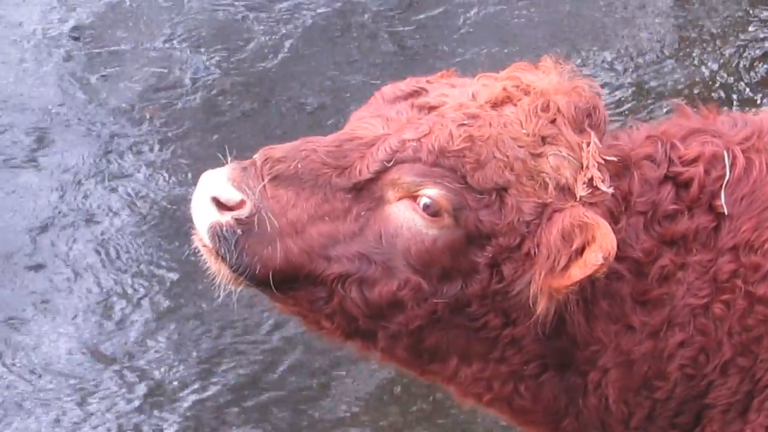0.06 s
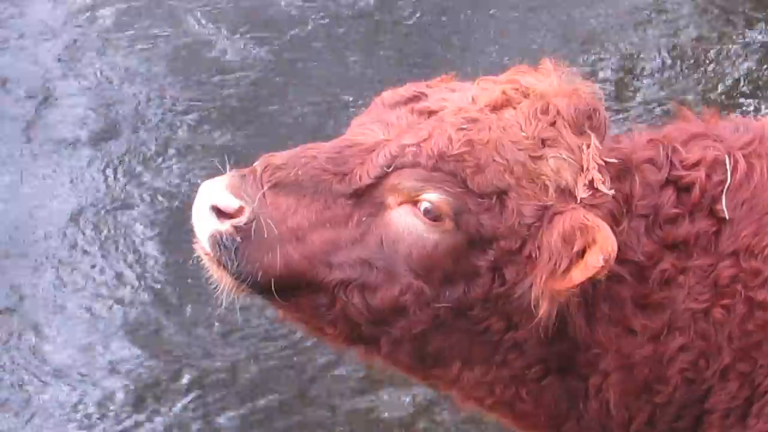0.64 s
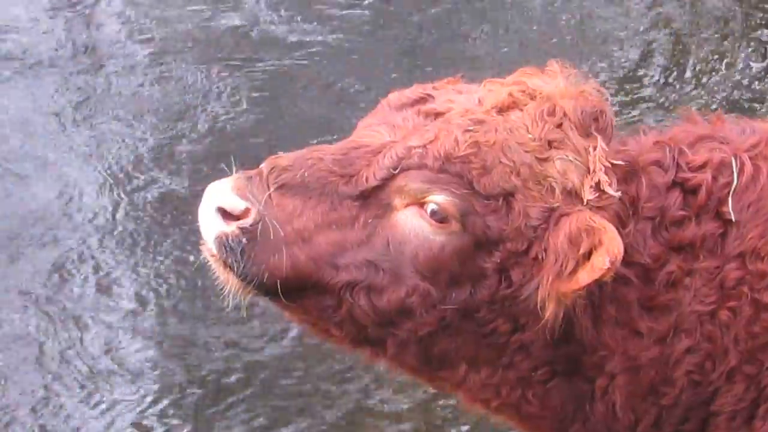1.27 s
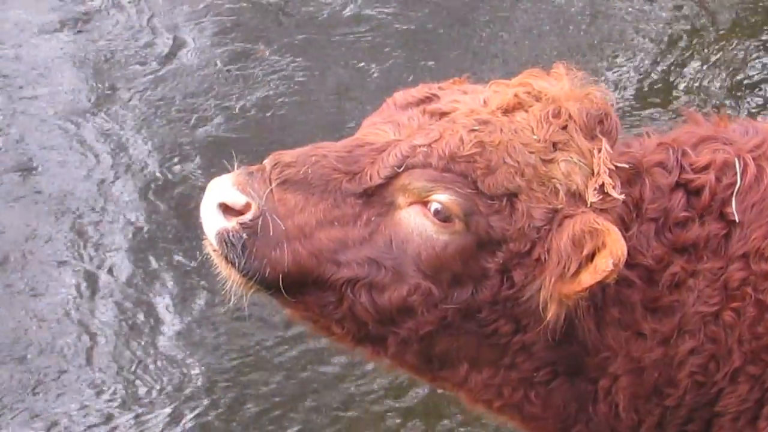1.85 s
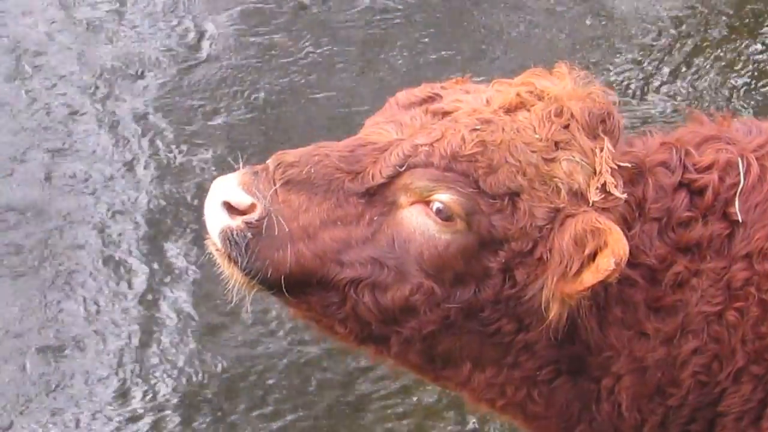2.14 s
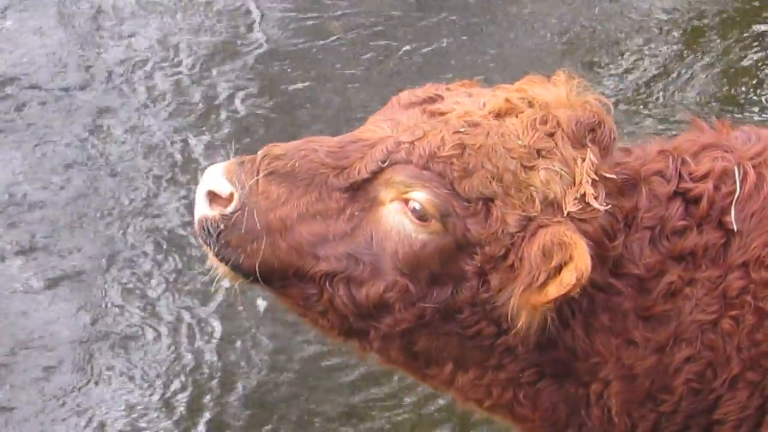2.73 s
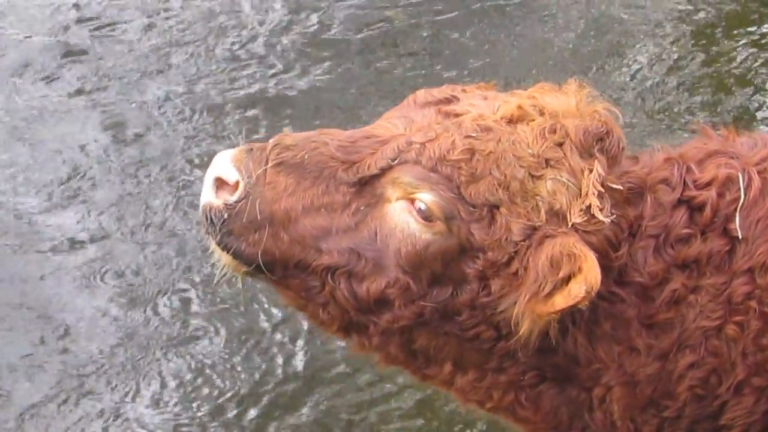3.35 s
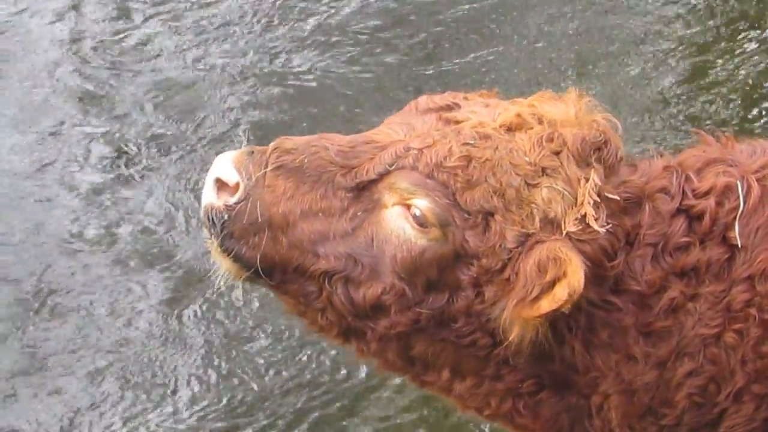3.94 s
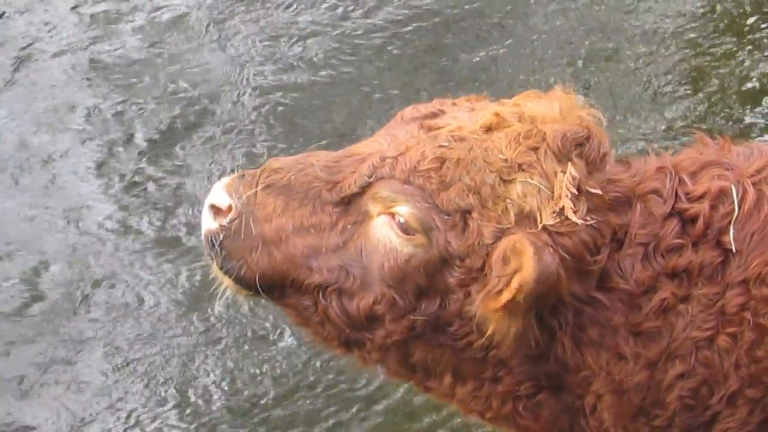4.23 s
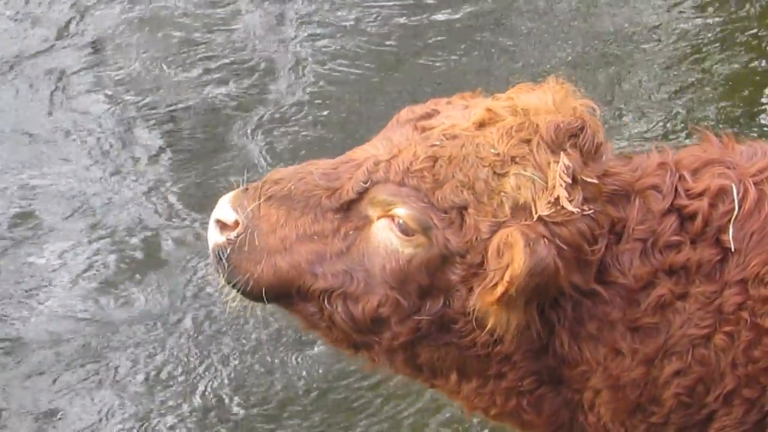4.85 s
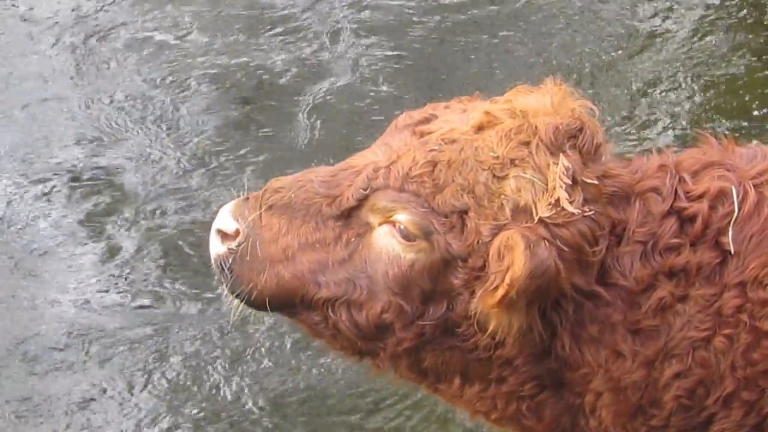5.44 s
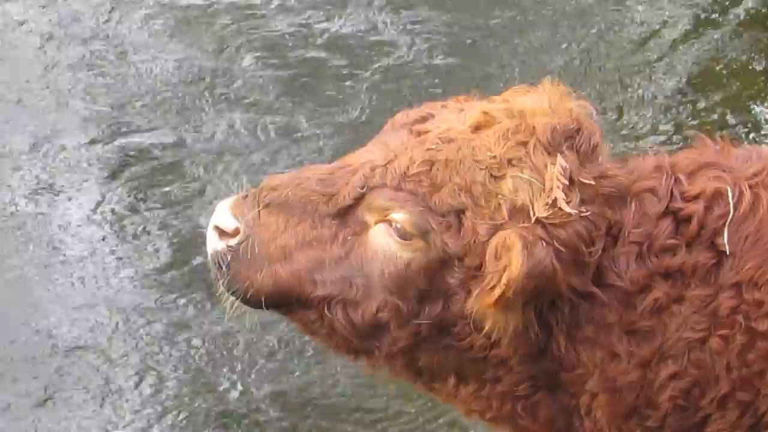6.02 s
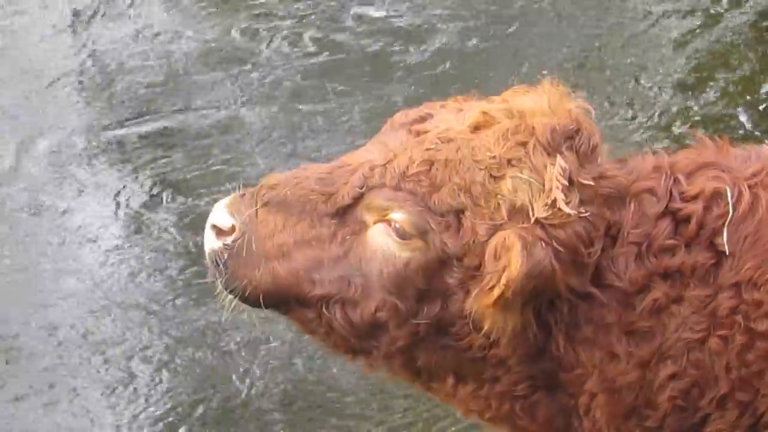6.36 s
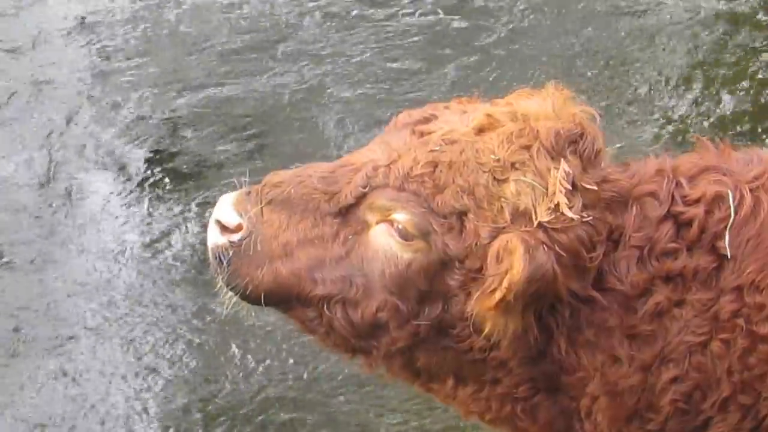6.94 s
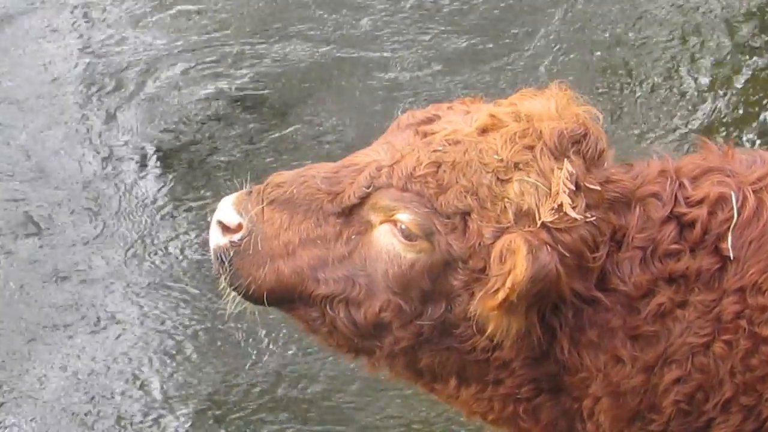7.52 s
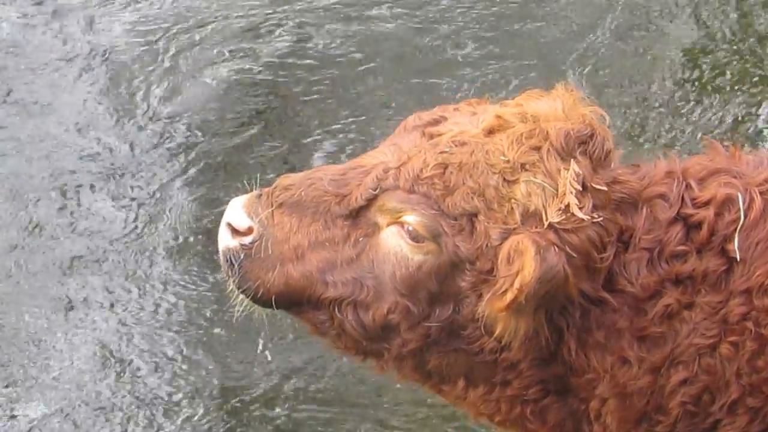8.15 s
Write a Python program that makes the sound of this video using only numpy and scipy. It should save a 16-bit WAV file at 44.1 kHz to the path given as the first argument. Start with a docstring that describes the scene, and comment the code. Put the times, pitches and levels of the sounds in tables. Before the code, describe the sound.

A creek rushes steadily with faint bubbling. About two seconds in, a bull starts a low closed-mouth hum with breath hissing through its nose. The pitch climbs and opens into a loud blare, cracks into a thin whistle, turns to a hoarse roar and drops away in a grunt. The water runs on alone, heard outdoors in stereo with the animal close by.

```python
"""A creek rushes steadily, heard in stereo. After two seconds a bull bellows once beside it.
Pulses of the vocal folds hum in the shut mouth and hiss through the nose, climbing two octaves.
The mouth opens on a clear harmonic blare; the voice cracks into a thin whistle, a second oscillation
of the larynx; the strained folds flap irregularly and ring the throat in a hoarse roar.
At last they slacken and the pitch drops away in a grunt. The water and its bubbles run on."""
import sys
import numpy as np
from scipy import signal
from scipy.fft import rfft, irfft
from scipy.io import wavfile
from scipy.ndimage import uniform_filter1d

SR = 44100
rng = np.random.default_rng(int(sys.argv[2]) if len(sys.argv) > 2 else 0)


def pcm_store(signal):
    """Save signal as 16-bit PCM."""
    levels = np.round(np.clip(np.atleast_2d(signal), -1, 1) * 32767)
    wavfile.write(sys.argv[1], SR, levels.astype(np.int16).T)


N = 361179
T = np.arange(2 * SR, int(4.5 * SR)) / SR  # time axis of the call, t/s
GRUNT_START_S, GRUNT_ATTACK_S = 3.892, 0.053


def bellow(whistle_cycles, slack_roughness=0.88, slack_db=-3):
    """Periodic and chaotic vibration of the vocal folds: roughness shifts power from blare to roar."""
    gain, upper_db, roughness = pushes()
    slack = np.clip((T - GRUNT_START_S) / GRUNT_ATTACK_S, 0, 1)  # the folds lose tone and force
    roughness = np.clip(roughness + slack * (slack_roughness - roughness), 0, 1)
    periodic = np.sqrt(1 - roughness ** 2) * blare(whistle_cycles, upper_db, roughness)
    chaotic = roughness * roar(upper_db)
    return gain * amp(slack_db * slack) * (periodic + chaotic)


# Pushes of breath through the open mouth:
# start t/s, length t/s, release t/s, level/dB, relative upper-throat level/dB, roughness (0-1)
BREATH_PUSHES = [(2.868, 0.041, 0.024, -12, -16, 0.08), (2.913, 0.12, 0.027, -13, -12, 0.1),
                 (3.036, 0.051, 0.021, -12.5, -11, 0.13), (3.099, 0.056, .01, -14.5, -10.5, 0.43),
                 (3.162, 0.039, 0.043, -12, -13, 0.23), (3.305, 0.023, 0.013, -22.5, -9, .5),
                 (3.359, 0.025, 0.048, -27.5, -1.5, 0.53), (3.455, 0.078, 0.0061, -16, -9, 0.67),
                 (3.529, .075, 0.027, -13.5, -7.5, 0.53), (3.614, 0.17, 0.016, -15.5, -9.5, 0.76),
                 (3.784, 0.16, 0.035, -15, -10, 0.57)]


def pushes(attack_s=0.016, rough_attack_s=0.0074, sag_db_per_s=4):
    """Overlapping pushes add in power; upper-throat level and roughness are power-weighted means."""
    gains = np.array([envelope(start, attack_s + rough_attack_s * roughness, length, release)
                      * amp(db - sag_db_per_s * (T - start))
                      for start, length, release, db, _, roughness in BREATH_PUSHES])
    power = (gains ** 2).sum(0)
    upper_db, roughness = np.transpose(BREATH_PUSHES)[-2:] @ gains ** 2 / (power + 1e-20)
    return np.sqrt(power), upper_db, np.clip(roughness, 0, 1)


# Upper partials of the blare: harmonic number, relative level/dB
BLARE_HARMONICS = [(3, -27), (4, -22), (5, -10.5), (6, -31), (7, -39.5), (8, -41), (9, -43)]


def blare(whistle_cycles, upper_db, roughness, half_clear_roughness=0.19):
    """A harmonic series led by its second partial, which lies on the throat's resonance."""
    clarity = 1 / (1 + (roughness / half_clear_roughness) ** 2)
    richness_db = upper_db + 14
    fundamental_db = clarity * (richness_db - 13) - (1 - clarity) * 30.5
    cycles, _, _ = vocal_folds(voice_pitch(), jitter=0.002 + 0.05 * roughness, jitter_hz=110)
    phase, whistle_phase = 2 * np.pi * cycles, 2 * np.pi * whistle_cycles
    core = np.cos(2 * phase) + amp(fundamental_db) * np.cos(phase)
    harmonics = sum(amp(db + 2.2 * drift(30)) * np.cos(k * phase) for k, db in BLARE_HARMONICS)
    # folds and whistle modulate each other, giving sum and difference tones
    sidebands = np.cos(whistle_phase + 2 * phase) + amp(-10) * np.cos(2 * whistle_phase - 2 * phase)
    tone = core + clarity * amp(richness_db) * harmonics + (1 - clarity) * amp(upper_db - 2) * sidebands
    shimmer = amp(2.5 * roughness * drift(81))
    return np.sqrt(2) * tone * shimmer


# Lower and upper resonances of the throat: f/Hz, bandwidth/Hz, relative level/dB
THROAT_FORMANTS = [(345, 26, -11.5), (472, 30, 2.5), (561, 52, -2.5), (652, 45, 0), (747, 48, -7),
                   (1147, 22, -9)]
UPPER_FORMANTS = [(1457, 46, -3), (1517, 48, -6), (1693, 33, -10), (1952, 34, -12.5), (2273, 18, -21.5),
                  (2650, 50, -30)]
# Spectrum of the rasping breath: f/Hz, relative level/dB
RASP_SPECTRUM = [(200, -29), (350, -18.5), (560, -3), (750, -17), (950, -9), (1350, -23), (1550, -11),
                 (1980, -17), (2300, -36), (3000, -29), (5000, -43.5), (7000, -56), (10000, -63.5),
                 (15000, -81)]


def roar(upper_db, rasp_db=-10):
    """Aperiodic excitation: closures of uneven size and spacing ring the formants of the throat."""
    _, pulses, puffs = vocal_folds(voice_pitch(), jitter=0.3, jitter_hz=178.46)
    flaps = pulses * amp(2.9 * drift(120)) + 0.61 * puffs
    lower = steady_rms(bandpass(resonate(flaps, THROAT_FORMANTS), 377, 1350), size=700)
    upper = steady_rms(bandpass(resonate(flaps, UPPER_FORMANTS), 1290, 2700), size=700)
    rasp = unit_rms(shape_spectrum(puffs, RASP_SPECTRUM))
    return lower + amp(upper_db + 1.5) * upper + amp(rasp_db) * rasp


# Fundamental of the folds as it climbs, then as it wavers under strain: t/s, f/Hz
RISING_PITCH = [(2.1, 71.84), (2.308, 94.7), (2.464, 119.3), (2.578, 151.1), (2.614, 174.5), (2.662, 228.5),
                (2.754, 274.6), (2.8, 289.6), (2.87, 305.3), (2.966, 305.7), (3.1, 346.3)]
STRAINED_PITCH = [(3.107, 320.4), (3.154, 300.8), (3.18, 315.8), (3.24, 332.5), (3.33, 335), (3.385, 262.9),
                  (3.48, 288.3), (3.87, 283)]


def voice_pitch():
    """The rate at which the folds close is the fundamental frequency of hum, blare and roar."""
    return contour(RISING_PITCH + STRAINED_PITCH)


def vocal_folds(hz, jitter, jitter_hz):
    """The glottal source: its cycle count, a pulse at each closure and the puff of air after it."""
    cycles = np.cumsum(hz * (1 + jitter * drift(jitter_hz))) / SR
    offset = (cycles - np.round(cycles)) * SR / hz  # samples from the nearest closure
    pulses = np.sinc(offset * 3 / 4) * np.exp(-(offset / 8) ** 2)
    pulse_mean = 4 / 3 * hz / SR
    puffs = (0.12 + np.exp(-(cycles % 1) / 0.28)) * rng.standard_normal(len(T))
    return cycles, steady_rms(pulses - pulse_mean, size=2000), unit_rms(puffs)


# Response of the vocal tract in the grunt: f/Hz, relative level/dB
GRUNT_SPECTRUM = [(70, -13), (140, -5), (230, 11), (330, -3.5), (480, -1.5), (600, -27), (760, 5.5),
                  (950, -28), (1500, -11), (3000, -57.5)]


def grunt(from_hz=345, to_hz=69.6, middle_s=3.954, fall_s=0.025, level_db=-15.5):
    """Pitch falls with tension: the folds slacken along an S-curve into a few uneven flaps."""
    hz = to_hz + (from_hz - to_hz) / (1 + np.exp((T - middle_s) / fall_s))
    _, pulses, puffs = vocal_folds(hz, jitter=0.046, jitter_hz=90.3)
    voice = steady_rms(shape_spectrum(pulses + 0.078 * puffs, GRUNT_SPECTRUM), size=600)
    return envelope(GRUNT_START_S, GRUNT_ATTACK_S, length=0.065, release=0.05) * amp(level_db) * voice


# Response of the vocal tract with the mouth shut: f/Hz, relative level/dB
HUM_SPECTRUM = [(50, -2.5), (75, 13), (100, 11), (135, 4.5), (200, 7.5), (280, 5), (400, 2.5), (580, -4),
                (680, -4), (760, 1.5), (860, -8.5), (1000, -14.5), (1200, -23), (1500, -17), (2200, -55),
                (4000, -62)]


def hum(pulses, puffs, level_db=-23, slack_hz=77.3, register_hz=164):
    """Source and filter: the shut mouth passes mainly the low partials of the glottal pulses."""
    hz = voice_pitch()
    slack_loss_db = 16.5 * (slack_hz / hz) ** 2  # slack folds sound weakly
    register_dip_db = 8.5 * np.exp(-(np.log2(hz / register_hz) / 0.085) ** 2)  # the register changes
    source = slow_opening(pulses) + 0.5 * bandpass(puffs, 400, 5000)
    boom = steady_rms(shape_spectrum(source, HUM_SPECTRUM), size=1500)
    gain = envelope(start=2.085, attack=0.05, length=0.783, release=0.014)
    return gain * amp(level_db - slack_loss_db - register_dip_db) * boom


def slow_opening(pulses, corner_hz=55):
    """All-pass dispersion: the folds open slowly and snap shut, so low tones lead each pulse."""
    pole = np.exp(-2 * np.pi * corner_hz / SR)
    return signal.lfilter([pole, -1], [1, -pole], pulses[::-1])[::-1]


# Partials of the whistle: harmonic number, relative level/dB
WHISTLE_HARMONICS = [(1, -2.5), (2, -13), (3, -23.5), (4, -54), (5, -37.5), (6, -39), (8, -46)]


def whistle(top_s=3.265, top_hz=1044, floor_hz=968, bend_hz_per_s2=970, level_db=-28.5):
    """Biphonation: a second, higher oscillation of the larynx, richer the louder it is."""
    hz = np.maximum(top_hz - bend_hz_per_s2 * (T - top_s) ** 2, floor_hz)
    force = envelope(start=3.02, attack=0.33, length=0.44, release=0.061)
    cycles = np.cumsum(hz * (1 + 0.004 * drift(90))) / SR
    tone = 0
    for k, db in WHISTLE_HARMONICS:
        waver_db = 2.5 * np.log(k) * drift(22)
        tone += amp(db + waver_db) * force ** (0.36 * np.log(k)) * np.cos(2 * np.pi * k * cycles)
    return force * amp(level_db) * unit_rms(tone), cycles


# Airflow through the nose, greatest just before the mouth opens: t/s, relative level/dB
NASAL_FLOW = [(2.1, -25), (2.17, -9.5), (2.32, -6), (2.38, -12), (2.44, -5.5), (2.6, -1), (2.79, -0.5),
              (2.93, -2.5), (3.06, -6.5), (3.28, -12.5), (3.96, -12), (4.06, -18)]
# Resonances of nasal cavity, nostrils, narrowed nostrils and jet: f/Hz, bandwidth/Hz, relative level/dB
CAVITY_MODES = [(1685, 93, 3), (2280, 140, -3.5), (2580, 117, 4), (2500, 84, -12), (3200, 140, -12.5)]
NOSTRIL_MODES = [(3710, 110, -9.5), (4280, 350, -18.5), (5100, 130, -6)]
NARROWED_MODES = [(1760, 32, -5), (3630, 63, -17), (4420, 80, -1)]
JET_MODES = [(3200, 500, -5), (6440, 660, -2), (7600, 270, -0.5), (8160, 200, -5.5), (9350, 110, 6.5),
             (10060, 490, 3), (10700, 420, 7), (12000, 900, -10), (13650, 300, -10)]
# Broadband hiss of the jet: f/Hz, relative level/dB
JET_SPECTRUM = [(1000, -27.5), (3000, -4.5), (4500, 0), (6500, -5.5), (8500, 4.5), (11000, -10),
                (13000, -1.5), (14000, -16), (15000, -25.5)]


def nose(pulses, puffs):
    """Forced resonance: air chopped by the folds buzzes, wheezes and hisses, louder with more flow."""
    flow_db = contour(NASAL_FLOW)
    flowing = (T > NASAL_FLOW[0][0]) & (T < NASAL_FLOW[-1][0])
    buzz = steady_rms(bandpass(resonate(pulses + 0.7 * puffs, CAVITY_MODES), 1400, 4700))
    wheeze = steady_rms(bandpass(resonate(pulses + 0.99 * puffs, NOSTRIL_MODES), 2400, 5400))
    # the jet wanders, so its high resonances come and go
    jet = puffs + 0.22 * pulses
    sibilance = sum(amp(2.5 * drift(7)) * resonate(jet, [mode]) for mode in JET_MODES)
    hiss = steady_rms(unit_rms(sibilance) + amp(-4) * unit_rms(shape_spectrum(jet, JET_SPECTRUM)))
    breath = (amp(-38 + 1.2 * flow_db) * buzz
              + amp(-49 + 0.84 * flow_db) * wheeze
              + amp(-51 + 1.16 * flow_db) * hiss)
    # the nostrils sing while they are still narrow
    narrow = envelope(start=2.15, attack=0.13, length=0.19, release=0.036)
    singing = steady_rms(bandpass(resonate(pulses + puffs, NARROWED_MODES), 1400, 3800))
    return flowing * breath + narrow * amp(-45.5) * singing


def bank_echoes(x, t60_s=0.35, level_db=-22, echoes_per_s=2000, first_s=0.006):
    """Scattering from the water and the banks sends different faint echoes to each microphone."""
    t = np.arange(SR // 2) / SR
    taps = rng.standard_normal((2, len(t))) * (rng.random((2, len(t))) < echoes_per_s / SR)
    taps *= amp(-60 * t / t60_s) * (t > first_s)
    taps /= np.linalg.norm(taps[0])
    return amp(level_db) * signal.fftconvolve(x[None], taps, axes=1)[:, :len(x)]


# Spectral density of the rushing water: f/Hz, relative level/dB
RUSH_SPECTRUM = [(20, -13), (27, -15), (35, -4.5), (47, -19.5), (62, -2.5), (80, -8), (120, 2.5),
                 (190, -8.5), (300, -5.5), (480, -13), (800, -12.5), (1700, -18.5), (4500, -29),
                 (7000, -31), (11000, -39), (13500, -42.5), (15000, -69.5)]
# Resonant peaks of its gurgle: f/Hz, bandwidth/Hz, added level/dB
GURGLE_PEAKS = [(295, 45, 4.5), (548, 45, 7), (730, 60, 3.5), (10150, 600, 5)]
# Likeness of left and right: f/Hz, coherence (0-1)
RUSH_COHERENCE = [(30, .5), (60, .9), (130, 0.64), (290, 0.51), (630, 0.41), (1400, 0.47), (3000, 0.62),
                  (6600, 0.16), (14000, 0.067)]
# Excess of left over right: f/Hz, level/dB
RUSH_BALANCE = [(60, 3), (200, 0), (700, -.5), (1300, -1), (2300, -3.5), (4300, -1.5), (8000, 0),
                (14000, 0)]


def creek(level_db=-37.5, patch_db=0.87, swell_db=-0.1, left_delay_s=45e-6):
    """Random superposition: countless bubbles merge into noise, with drifting spectral patches."""
    frames, hz = N // 512 + 5, np.fft.rfftfreq(2048, 1 / SR)
    left_re, left_im, other_re, other_im, patches = rng.standard_normal((5, frames, len(hz)))
    patches = unit_rms(uniform_filter1d(uniform_filter1d(patches, size=4, axis=0), size=14, axis=1))
    swell = unit_rms(uniform_filter1d(rng.standard_normal(frames), size=25))[:, None]
    coherence = value_at(RUSH_COHERENCE, hz)
    left = left_re + 1j * left_im
    right = coherence * left + np.sqrt(1 - coherence ** 2) * (other_re + 1j * other_im)
    right *= np.exp(2j * np.pi * hz * left_delay_s)
    balance = amp(value_at(RUSH_BALANCE, hz) / 2)
    gurgle_db = sum(db / (1 + (2 * (hz - centre) / width) ** 2) for centre, width, db in GURGLE_PEAKS)
    spectrum_db = value_at(RUSH_SPECTRUM, hz) + gurgle_db + patch_db * patches + swell_db * swell
    spectra = np.array([left * balance, right / balance]) * amp(spectrum_db)
    _, rush = signal.istft(spectra.swapaxes(1, 2), nperseg=2048, noverlap=1536)
    return amp(level_db) * unit_rms(rush[:, :N])


def bubbles(per_s=120, level_db=-57, decay_cycles=9, spread_db=2.0, sizes=30):
    """Damped oscillators: nearer bubbles ring as tiny plinks of rising pitch."""
    out, t = np.zeros((2, N)), np.arange(2000) / SR
    for hz in np.geomspace(500, 6000, sizes):
        decay = np.exp(-hz * t / decay_cycles) * (1 - np.exp(-hz * t))
        plink = np.sin(2 * np.pi * hz * t * (1 + 3 * t)) * decay / hz ** 0.31
        onsets = rng.random(N) < per_s / sizes / SR
        strengths = amp(spread_db * np.minimum(rng.exponential(1, N), 4))
        left_share = rng.uniform(0.3, 0.7)
        out += np.outer([left_share, 1 - left_share], signal.oaconvolve(onsets * strengths, plink)[:N])
    return amp(level_db) * unit_rms(out)


def amp(db):
    """Amplitude ratio of a level in decibels."""
    return 10 ** (np.asarray(db) / 20)


def unit_rms(x):
    """Normalisation to an overall rms of 1."""
    return x / np.sqrt(np.mean(x ** 2) + 1e-20)


def steady_rms(x, size=1200):
    """Normalisation to a running rms of 1, smoothed over size samples."""
    return x / np.sqrt(abs(uniform_filter1d(uniform_filter1d(x ** 2, size), size)) + 1e-12)


def value_at(points, hz):
    """Interpolation on a logarithmic frequency axis."""
    f, value = np.transpose(points)
    return np.interp(np.log(hz + 1), np.log(f + 1), value)


def contour(points):
    """Linear interpolation over the time of the call."""
    return np.interp(T, *np.transpose(points))


def envelope(start, attack, length, release):
    """Linear rise, then exponential decay from start + length; all in seconds."""
    return np.clip((T - start) / attack, 0, 1) * np.exp(-np.maximum(T - start - length, 0) / release)


def drift(rate_hz):
    """Random modulation: low-pass noise of rms 1."""
    hz = np.fft.rfftfreq(len(T), 1 / SR)
    return unit_rms(irfft(rfft(rng.standard_normal(len(T))) / (1 + (hz / rate_hz) ** 4), len(T)))


def shape_spectrum(x, points, size=4096):
    """Minimum-phase filter with the given magnitude response."""
    log_gain = np.log(amp(value_at(points, abs(np.fft.fftfreq(size, 1 / SR)))))
    kernel = np.fft.ifft(np.exp(np.conj(signal.hilbert(log_gain)))).real
    return signal.fftconvolve(x, kernel[:size // 2])[:len(x)]


def resonate(x, modes):
    """Modal superposition: parallel resonators of alternating sign."""
    return sum((-1) ** k * amp(db) * signal.lfilter(*signal.iirpeak(hz, hz / width, SR), x)
               for k, (hz, width, db) in enumerate(modes))


def bandpass(x, lo_hz, hi_hz):
    """Maximally flat band-pass filter."""
    return signal.sosfilt(signal.butter(3, [lo_hz, hi_hz], "band", fs=SR, output="sos"), x)


def scene():
    """Level differences set mouth and hum slightly left, nostrils slightly right, amid the creek."""
    whistle_tone, whistle_cycles = whistle()
    mouth = bellow(whistle_cycles) + whistle_tone + grunt()
    _, pulses, puffs = vocal_folds(voice_pitch(), jitter=0.016, jitter_hz=156)
    boom, nasal = hum(pulses, puffs), nose(pulses, puffs)
    direct = mouth * amp([[1.1], [-1.2]]) + boom * amp([[0.9], [-0.9]]) + nasal * amp([[-0.3], [0.3]])
    call = direct + bank_echoes(mouth + boom + nasal)
    out = creek() + bubbles()
    start = round(T[0] * SR)
    out[:, start:start + len(T)] += call
    return out


# Stop bands in the camera's response: f/Hz, bandwidth/Hz
STOP_BANDS = [(3925, 260), (7860, 280)]


def record(dry, cutoff_hz=14800):
    """Filters in cascade: the camera's two narrow notches, then its band limit."""
    for hz, width in STOP_BANDS:
        dry = signal.lfilter(*signal.iirnotch(hz, hz / width, SR), dry)
    lowpass = signal.firwin(255, cutoff_hz, window=("kaiser", 9), fs=SR)
    return signal.oaconvolve(dry, lowpass[None], "same")


dry = scene()
out = record(dry)
pcm_store(out)
```